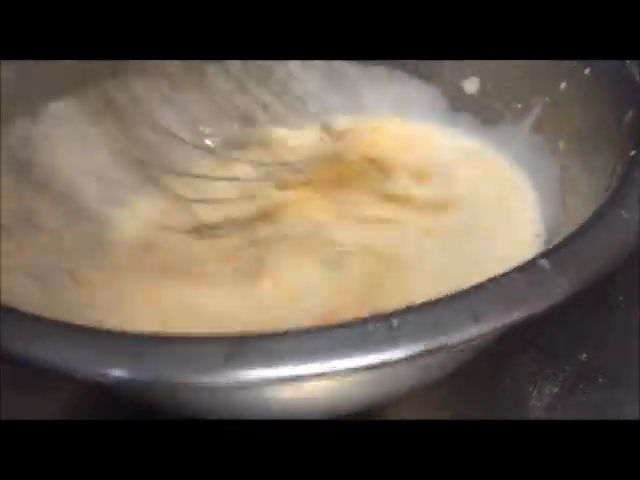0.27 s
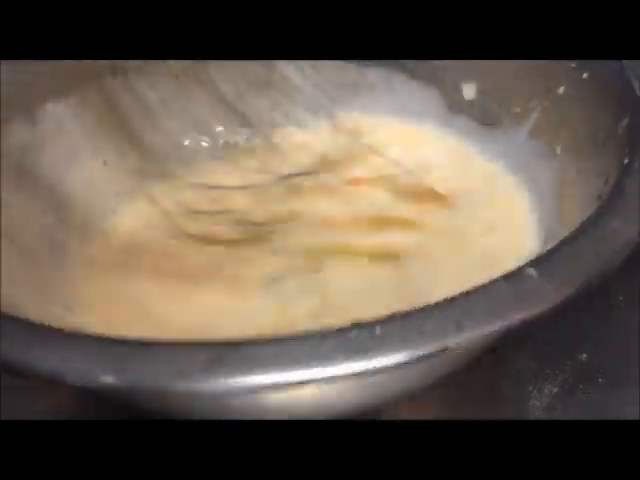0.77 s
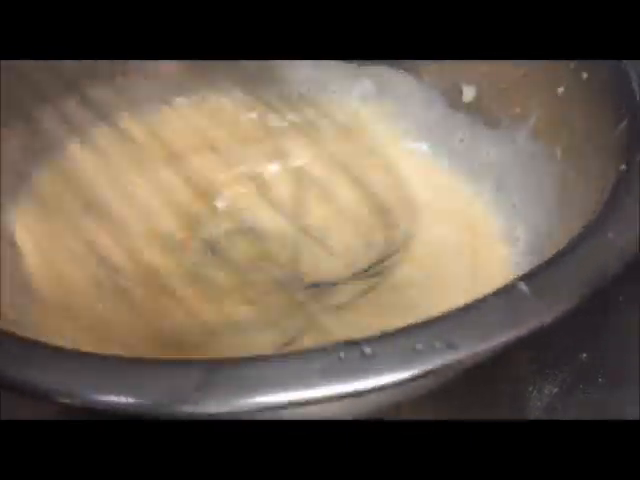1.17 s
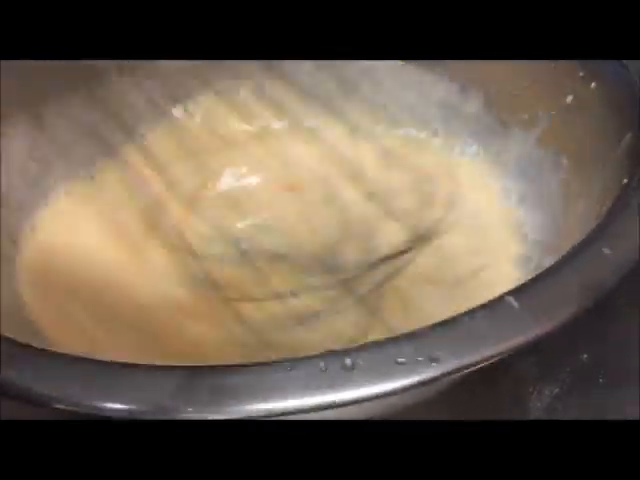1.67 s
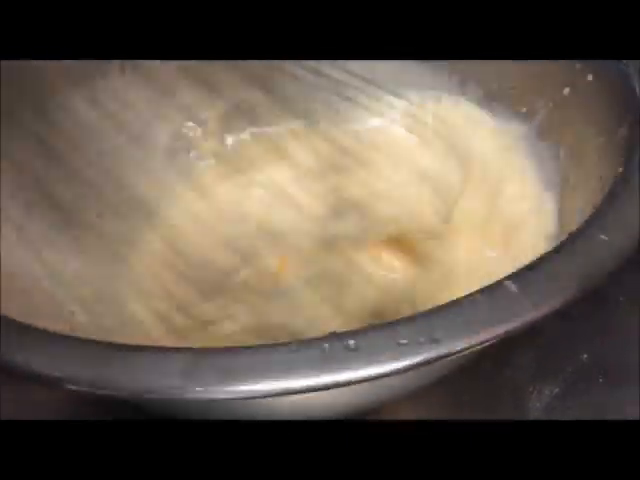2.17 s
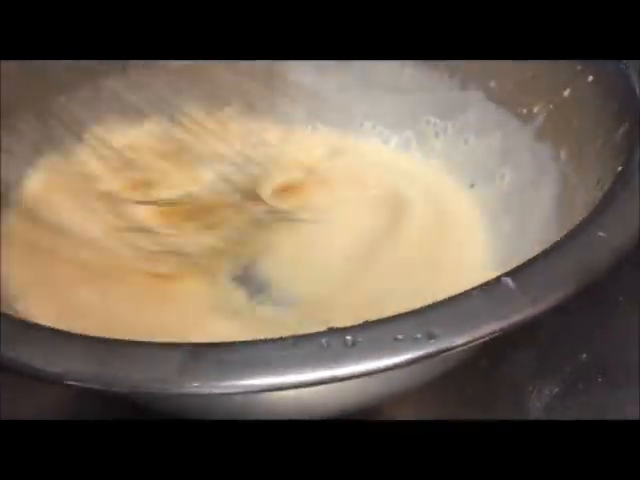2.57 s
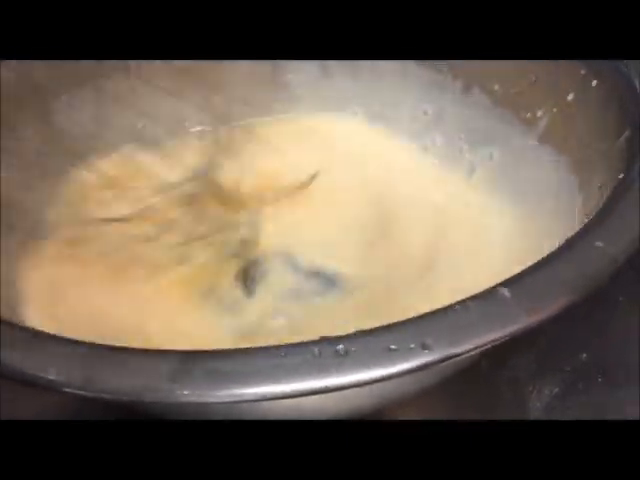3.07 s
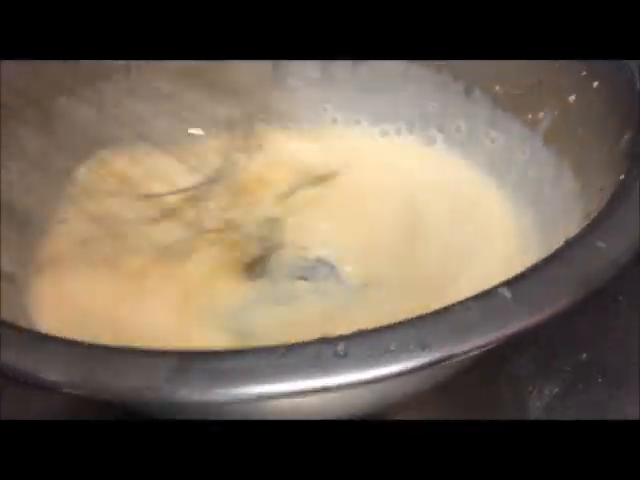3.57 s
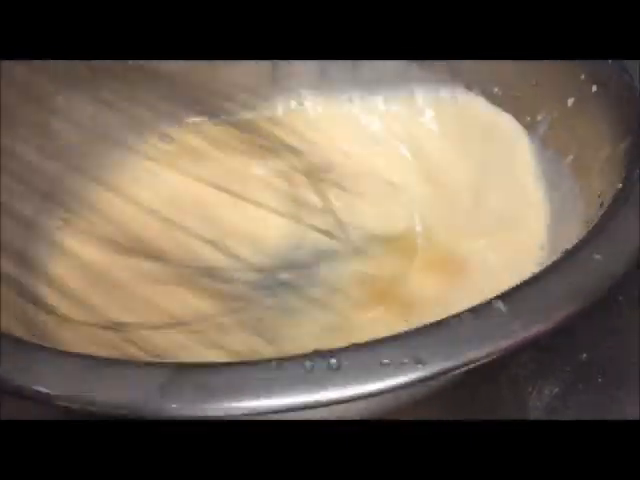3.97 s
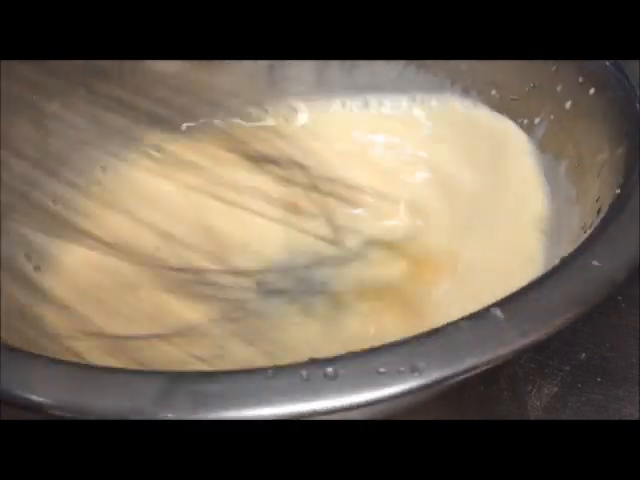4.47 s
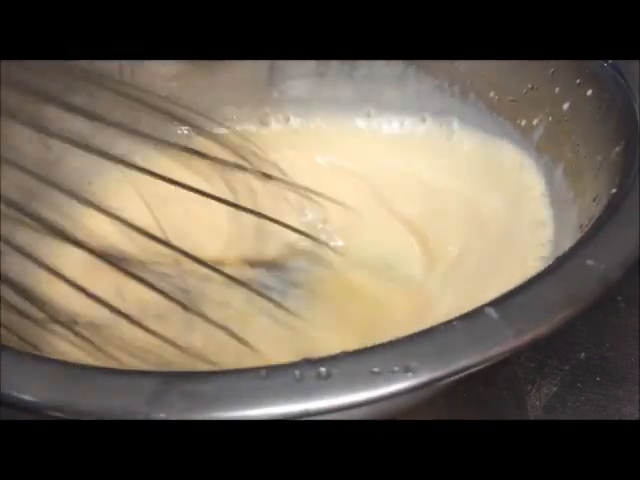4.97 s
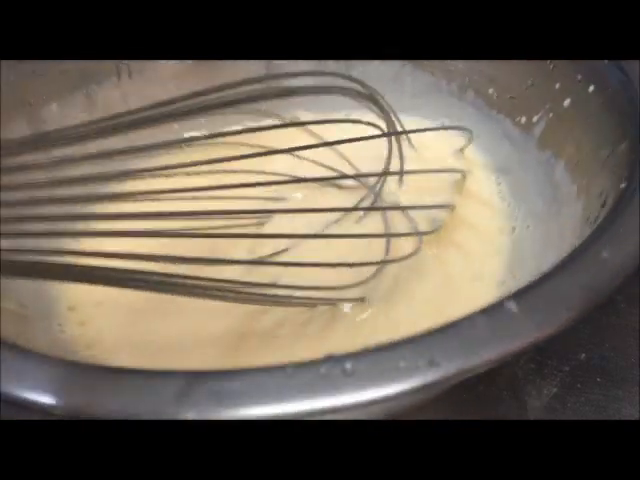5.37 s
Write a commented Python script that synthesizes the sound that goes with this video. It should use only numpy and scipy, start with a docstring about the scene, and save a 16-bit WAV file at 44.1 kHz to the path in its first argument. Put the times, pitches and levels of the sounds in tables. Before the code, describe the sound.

A wire whisk briskly beats thin egg batter in a steel bowl, metallic knocks and wet sloshing, then harder scraping sweeps before stopping.

```python
"""A light knock, then a gulp: close by in a kitchen, a wire whisk beats thin egg batter in a steel bowl.
Flicks at about four a second plunge in, and noise knocks with short notes put the wires on the far wall in turn.
After a brief lift the sweeps come harder and add scrapes, dense noise bursts under a swelling pressure; then it stops.
The batter is many small rising sine bubbles and crackling noise; filters with resonances make the bowl ring.
Short room reflections surround it, dull thumps come from the counter, and a fan hums behind."""
import sys
import numpy as np
from scipy import signal
from scipy.fft import rfft, irfft
from scipy.io import wavfile

SR = 44100
rng = np.random.default_rng(int(sys.argv[2]) if len(sys.argv) > 2 else 0)


def wav_out(sig):
    """Save sig, one row per channel (or a flat mono array), as 16-bit PCM at SR to the path in sys.argv[1]."""
    wavfile.write(sys.argv[1], SR, np.round(np.clip(np.atleast_2d(sig).T, -1, 1) * 32767).astype(np.int16))


N = 248456
TIME = np.arange(N) / SR

# flicks across the bowl, each begun by a knock on the bottom: start_s, knock_db
FLICKS = [(.0977, -17.5), (.318, -17.5), (.553, -22), (.804, -21), (1.058, -19), (1.314, -18.5),
          (1.563, -16.5), (1.82, -21.5)]
# sweeps round the bowl that dive through the batter: start_s, knock_db, gulp_db
SWEEPS = [(2.276, -23.5, -45), (2.497, -20, -41), (2.788, -22.5, -26.5), (3.055, -23.5, -36),
          (3.318, -23.5, -33), (3.5543, -16, -24.5), (3.806, -14.5, -24.5), (4.0557, -15.5, -29.5),
          (4.304, -15.5, -29), (4.563, -18.5, -29), (4.806, -12.5, -26.5), (5.051, -16, -29.5),
          (5.276, -22, -38)]
# each flick ends on the far wall: start_s, bowl_clank_db, wire_ting_db, gap_to_next_wire_s
WALL_KNOCKS = [(0.1509, -19, -19.5, .036), (0.3692, -14.5, -15, .043), (.6132, -19, -16.5, 0.044),
               (0.8637, -16.5, -14.5, 0.049), (1.111, -17, -16.5, 0.055), (1.372, -17, -13.5, .039),
               (1.6163, -16, -15, 0.036), (1.865, -18, -17.5, .028)]
# wires reaching the far wall in turn, relative to the wall knock: clank_db, ting_db
WIRE_TURNS = [(-0.5, 0.5), (-7, -9), (-9, -8)]
# wires land on the wall and drag along it: start_s, length_s, bowl_clank_db, wire_ting_db, landing_knock_db
SCRAPES = [(2.167, 0.037, -24.5, -22.5, -17.5), (2.565, 0.091, -30.5, -20.5, -17.5),
           (2.689, 0.044, -21, -18, -14), (2.954, .058, -22.5, -19, -19), (3.213, 0.043, -16, -12.5, -22),
           (3.425, 0.076, -20.5, -17, -26), (3.676, 0.083, -20.5, -21, -20.5),
           (3.923, 0.078, -28, -18, -16), (4.196, 0.061, -18, -20.5, -20.5), (4.42, .065, -22.5, -18, -9.5),
           (4.69, 0.068, -17.5, -16.5, -19), (4.923, 0.066, -22.5, -15.5, -16),
           (5.165, 0.059, -16, -17, -29)]
# lone knocks between the strokes: start_s, bowl_clank_db, wire_ting_db
LONE_KNOCKS = [(.007, -29, -25.5), (.2228, -34, -18.5), (1.162, -22, -19.5), (2.013, -29.5, -38),
               (2.35, -23, -30), (2.599, -27, -20.5), (2.972, -32, -11), (3.154, -31, -19.5),
               (4.628, -18, -25.5)]
# how briskly the whisk stirs, before the swish of each stroke: time_s, slosh_db, wire_rustle_db
STIR = [(0.0, -32.5, -33), (0.34, -35.5, -33), (1.32, -30.5, -32), (1.5, -26.5, -26), (1.82, -29.5, -29),
        (2.01, -35.5, -35), (2.22, -30, -30), (2.4, -30, -30), (3.9, -24, -26.5), (5.14, -25.5, -29.5),
        (5.38, -41, -44.5), (5.63, -46, -62)]
# swish over one stroke, quietest near the turn before the next plunge: share_of_stroke, level_db
FLICK_SWISH = [(0, -2.5), (.08, 4), (.35, 2.5), (.62, 1.5), (.8, -5.5), (1, -4)]
SWEEP_SWISH = [(0, -0.5), (.12, 3), (.35, -1), (.62, 2.5), (.76, 0.5), (.87, -4.5), (1, 1)]
# a rubbed wire or the bowl sings out briefly: start_s, centre_pitch_hz, level_db
RINGS = [(1.866, 1294, -15.5), (2.244, 2400, -23), (2.6, 7360, -12), (2.708, 4040, -8), (4.421, 6380, -11)]
# the lifted whisk touches the bowl softly: start_s, level_db (before softening)
TAP = (5.538, -23)
# the bowl rocks on the counter: start_s, level_db
THUMPS = [(0.386, -40), (1.371, -31.5), (1.9, -34), (5.58, -36)]
# broad colours of bowl, wires, batter and the air of the kitchen: frequency_hz, relative_level_db
CLANK_COLOUR = [(150, -32.5), (400, -10.5), (520, -14), (750, -6), (1400, -2), (2200, 1.5), (3400, 3.5),
                (4200, -8.5), (6000, -28.5)]
TING_COLOUR = [(2000, -16.5), (3400, -11.5), (4100, 0), (4800, -5), (6300, -1.5), (7800, -1.5),
               (9400, -5.5), (10400, -11.5), (11300, -8), (15300, -16)]
BATTER_COLOUR = [(150, -22), (350, -3), (500, -12), (700, -2), (1000, -1), (1400, -0.5), (3000, 2.5),
                 (4500, -4.5), (9000, -6.5), (15000, -19.5)]
KITCHEN_COLOUR = [(20, -10), (35, -36), (50, -7.5), (80, 1.5), (130, 2), (175, -14.5), (260, 0),
                  (450, -17.5), (1000, -12.5), (3000, -34), (8000, -53), (15000, -57)]
# resonances of the filled bowl: frequency_hz, width_hz, level_over_broad_colour_db
BOWL_MODES = [(670, 47, -3.5), (833, 8.9, -13), (1297, 38, -6), (1472, 46, -9.5), (2161, 49, 0),
              (2680, 106, -2), (3530, 240, -8), (4400, 53, -13), (5290, 350, -7.5), (6120, 120, -5.5),
              (6700, 89, -5.5), (7340, 104, -1)]
# fan tones: pitch_hz, level_db (before the swell)
FAN_TONES = [(91.5, -55), (119, -60), (130, -51), (264, -61)]

PLUNGE_TING_DB, FLICK_GULP_DB = -2.5, -13.5  # relative to the knock of the plunge
LAND_CLANK_DB = -10.5  # a glancing landing hardly stirs the bowl: clank relative to the landing knock
WALL_RING_HZ, WALL_RING_DB = 2150, 0.5  # the modes that a wall knock wakes, level relative to its clank
SCRAPE_ARCH_DB = 3.5  # a scrape presses harder in its middle than at its ends
SLOSH_DB, RUSTLE_DB = -1.5, -0.07  # overall level of the slosh and of the wire rustle
SLOSH_LAG_S = 0.034  # the slosh level runs this much behind the rustle level
LIFT_S, LIFT_WIDTH_S, LIFT_DB = 2.11, 0.049, -20.5  # the whisk leaves the batter between flicks and sweeps
REST_S, REST_FADE_S, REST_DB = 5.39, 0.032, -9.5  # the whisk comes to rest and the batter settles
TOP_HZ = 15400  # upper limit of the recorder


def whisk(rustle_db):
    """Knocks and stick-slip scrapes drive the low ring of the bowl and the bright ring of the wires."""
    low_slips = chatter(rate=600, spread_db=-2.0, fade_s=0.0026)
    high_slips = chatter(rate=600, spread_db=-2.0, fade_s=0.0026)
    hits = contacts()

    clank = knocks(hits, 1, rise_s=0.00057, fade_s=0.0091, follow_s=.008, follow_db=-8.0,
                   ring_hz=2005, ring_spread=.7, ring_cycles=114, ring_db=-13.5)
    clank = clank + low_slips * pressure(2, rise_s=0.0028, release_s=0.003)

    ting = knocks(hits, 2, rise_s=.0012, fade_s=.005, follow_s=.008, follow_db=-9,
                  ring_hz=6500, ring_spread=.55, ring_cycles=140, ring_db=-12)
    ting = ting + high_slips * pressure(3, rise_s=0.0046, release_s=0.0019)

    # between knocks the loops keep grazing the wall and each other
    rustle = undb(rustle_db) * chatter(rate=220, spread_db=2.5, fade_s=0.0039)
    steel = body(clank, CLANK_COLOUR, BOWL_MODES) + body(ting + rustle, TING_COLOUR, BOWL_MODES)
    return wander(steel, low_hz=1200, high_hz=13500, depth_db=5, rate=40, sharpness=18)


def contacts():
    """Every knock of wire on steel, as rows of (start_s, clank_db, ting_db)."""
    bottom = [(s, db, db + PLUNGE_TING_DB) for s, db, *_ in FLICKS + SWEEPS]
    wall = []
    for s, clank_db, ting_db, gap_s in WALL_KNOCKS:
        for k, (turn_clank_db, turn_ting_db) in enumerate(WIRE_TURNS):
            wall.append((s + k * gap_s, clank_db + turn_clank_db, ting_db + turn_ting_db))
    landings = [(s, db + LAND_CLANK_DB, db) for s, *_, db in SCRAPES]
    return bottom + wall + landings + LONE_KNOCKS


def knocks(rows, column, rise_s, fade_s, follow_s, follow_db,
           ring_hz, ring_spread, ring_cycles, ring_db, count=5):
    """One wire lands and buzzes on the steel, the next follows; each knock rings with a few notes of its own."""
    track, t = np.zeros(N), TIME[:SR // 10]
    attack = int(.012 * SR)  # the level is set over this opening
    for row in rows:
        late = t - follow_s * rng.uniform(.5, 1.4)
        second_wire = undb(follow_db) * (late > 0) * np.exp(-np.abs(late) / fade_s)
        hit = (np.exp(-t / fade_s) + second_wire) * rng.standard_normal(len(t))
        # ring_spread is in octaves either way
        notes_hz = ring_hz * 2 ** (ring_spread * rng.uniform(-1, 1, count))
        for hz, sign in zip(notes_hz, rng.choice([-1, 1], count)):
            note = ping(hz, ring_cycles)[:len(t)]
            hit[:len(note)] += undb(ring_db) * sign * note
        # the film of batter cushions the landing
        hit *= 1 - np.exp(-t / (rise_s * np.exp(rng.uniform(-1.2, .4))))
        add(track, row[0], hit * undb(row[column]) / np.sqrt(np.mean(hit[:attack] ** 2)))
    return track


def pressure(column, rise_s, release_s):
    """How hard the wires press on the wall: each scrape lands, swells to its middle and lets go."""
    total = np.zeros(N)
    for row in SCRAPES:
        age, length_s = TIME - row[0], row[1]
        arch_db = -SCRAPE_ARCH_DB * (2 * np.clip(age / length_s, 0, 1) - 1) ** 2
        landing = np.minimum(age, 0) / rise_s
        release = np.maximum(age - length_s, 0) / release_s
        total += undb(row[column] + arch_db) * np.exp(landing - release)
    return total


def swish():
    """Level in dB that rises and falls through each stroke, dips at the lift and drops at rest."""
    starts = [s for s, _ in plunges()]
    # one more stroke on either side covers the ends
    starts = [2 * starts[0] - starts[1], *starts, 2 * starts[-1] - starts[-2]]
    share = np.interp(TIME, starts, np.arange(len(starts))) % 1
    flick_db = np.interp(share, *np.transpose(FLICK_SWISH))
    sweep_db = np.interp(share, *np.transpose(SWEEP_SWISH))
    lift_db = LIFT_DB * np.exp(-((TIME - LIFT_S) / LIFT_WIDTH_S) ** 2)
    rest_db = REST_DB * np.clip((TIME - REST_S) / REST_FADE_S, 0, 1)
    return np.where(TIME < LIFT_S, flick_db, sweep_db) + lift_db + rest_db


def rings(rub_s, spread, count=5):
    """A short rub swells a cluster of close modes, which beat as they die."""
    track, t = np.zeros(N), TIME[:SR // 8]
    swell = t / rub_s * np.exp(1 - t / rub_s)
    wall_rings = [(s, WALL_RING_HZ, db + WALL_RING_DB) for s, db, *_ in WALL_KNOCKS]
    for s, hz, db in wall_rings + RINGS:
        notes_hz = hz * (1 + spread * np.linspace(-1, 1, count) * rng.random(count))
        notes = np.sin(2 * np.pi * (notes_hz * t[:, None] + rng.random(count)))
        ring = swell * notes.sum(axis=1)
        add(track, s, undb(db) * ring * np.linalg.norm(swell) / np.linalg.norm(ring))
    return track


def tap(fade_s, soft_hz):
    """A coated wire touches the bowl with a dull tick: a fading noise burst, softened above soft_hz."""
    track, t = np.zeros(N), TIME[:SR // 10]
    start_s, level_db = TAP
    add(track, start_s, undb(level_db) * rng.standard_normal(len(t)) * np.exp(-t / fade_s))
    softened = signal.lfilter(*signal.butter(1, soft_hz, fs=SR), track)
    return body(softened, BATTER_COLOUR, BOWL_MODES)


def batter(slosh_db, count=2400):
    """Bubbles of all sizes and wet crackle follow the stirring; the bowl colours them."""
    pitches = 480 * 2 ** (2.8 * rng.random(count) ** .7)
    times = rng.random(count) * N / SR
    froth = unit(bubbles(times, pitches, cycles=32, spread_db=2.5, glide=0.042))
    crackle = chatter(rate=300, spread_db=6.5, fade_s=0.0053)
    slosh = undb(slosh_db) * (crackle + froth / 2)
    plunge = gulps(length_s=.05, first_hz=2900, last_hz=1250, scatter=.38)
    liquid = body(slosh + plunge, BATTER_COLOUR, BOWL_MODES)
    return wander(liquid, low_hz=690, high_hz=3400, depth_db=6.5, rate=22, sharpness=30, count=14)


def plunges():
    """Every dive into the batter, as rows of (start_s, gulp_db)."""
    return [(s, db + FLICK_GULP_DB) for s, db in FLICKS] + [(s, db) for s, _, db in SWEEPS]


def gulps(length_s, first_hz, last_hz, scatter, count=48):
    """The cavity behind the wires opens up, so each plunge sheds ever larger, on the whole lower bubbles."""
    track = np.zeros(N)
    for s, db in plunges():
        age = (np.arange(count) + rng.random(count)) / count
        # scatter is in octaves
        hz = first_hz * (last_hz / first_hz) ** age * 2 ** (scatter * rng.standard_normal(count))
        track += undb(db) * bubbles(s + age * length_s, hz, cycles=26.0, spread_db=2.0, glide=0.066)
    return track


def bubbles(times, pitches, cycles, spread_db, glide):
    """Trapped air pockets of uneven size ring briefly in the liquid, rising in pitch."""
    track = np.zeros(N)
    chances = np.clip(rng.standard_normal((len(times), 2)), -2, 2)
    for s, hz, (size, life) in zip(times, pitches, chances):
        note = ping(min(hz, SR / 3), cycles * np.exp(life / 3), glide)
        add(track, s, undb(spread_db * size) * note)
    return track


def thumps(cycles):
    """The heavy bowl bumps the counter, which answers with a few dull notes."""
    track = np.zeros(N)
    for s, db in THUMPS:
        for hz in (56, 72, 97):
            add(track, s, undb(db) * ping(hz * rng.uniform(0.98, 1.34), cycles))
    return signal.sosfilt(signal.butter(6, 48, "high", fs=SR, output="sos"), track)


def room(x, t60_s, wet_db, gap_s):
    """Counter, tiles and cupboards return a short, diffuse tail after a gap."""
    t = TIME[:SR // 2]
    tail = rng.standard_normal(len(t)) * undb(-60 * t / t60_s) * np.clip(t / gap_s - 1, 0, 1)
    return x + undb(wet_db) * signal.fftconvolve(x, tail / np.linalg.norm(tail))[:N]


def fan():
    """A steady low rush of air with a few wavering tones that swell once, from 1.5 to 3 s."""
    swell_db = np.interp(TIME, (1.5, 3), (-2, 1))
    hum = np.zeros(N)
    for hz, db in FAN_TONES:
        gain = undb(db + swell_db + 1.9 * walk(9.9)) * np.sqrt(2)
        hum += gain * np.sin(2 * np.pi * hz * TIME + 0.89 * walk(12))
    return hum + undb(-41.5) * body(rng.standard_normal(N), KITCHEN_COLOUR)


def chatter(rate, spread_db, fade_s):
    """Tiny contacts of uneven size at random moments (rate per second), each a noise burst that dies away."""
    sizes = undb(spread_db * np.clip(rng.standard_normal(N), -2, 2))
    hits = (rng.random(N) < rate / SR) * sizes
    energy = signal.lfilter([1], [1, -np.exp(-2 / (fade_s * SR))], hits ** 2)
    return unit(np.sqrt(energy + 1e-18) * rng.standard_normal(N))


def ping(hz, cycles, glide=0):
    """A sine that falls by 60 dB in so many cycles of its first pitch while that pitch glides up."""
    life = np.arange(int(cycles / hz * SR) + 2) / (cycles / hz * SR)
    return np.sin(2 * np.pi * cycles * life * (1 + glide * life / 2)) * np.exp(-np.log(1000) * life)


def body(x, colour, modes=(), size=8192):
    """Ring x through a causal filter of unit energy: a broad colour with resonances on it."""
    hz = np.arange(size // 2 + 1) * SR / size + 1
    knots, db = np.transpose(colour)
    gain = undb(np.interp(np.log(hz), np.log(knots), db))
    gain = gain * np.abs(1 + sum(undb(d) / (1 + 2j * (hz - f) / w) for f, w, d in modes))
    # folding the cepstrum gives minimum phase, so the ring follows the blow
    cepstrum = irfft(np.log(gain))
    cepstrum[1:size // 2] *= 2
    cepstrum[size // 2 + 1:] = 0
    response = irfft(np.exp(rfft(cepstrum)))
    return signal.fftconvolve(x, response / np.linalg.norm(response))[:N]


def wander(x, low_hz, high_hz, depth_db, rate, sharpness, count=20):
    """As the whisk travels and the batter shifts, the bowl favours now these bands, now those."""
    out = x
    for hz in np.geomspace(low_hz, high_hz, count):
        drive = x * (undb(depth_db * np.clip(walk(rate), -2, 2)) - 1)
        out = out + signal.lfilter(*signal.iirpeak(hz, sharpness, fs=SR), drive)
    return out * np.std(x) / np.std(out)


def walk(rate):
    """Random drift with a spread near one, in straight lines between rate knots a second."""
    knots = rng.standard_normal(4096)
    return 1.2 * np.interp(TIME * rate, np.arange(len(knots)), knots)


def undb(db):
    """Decibels to gain."""
    return 10 ** (np.asarray(db) / 20)


def unit(x):
    """Scale to an rms of one."""
    return x / np.sqrt(np.mean(x ** 2) + 1e-18)


def add(track, s, sound):
    """Mix a sound into a track at time s."""
    i = int(np.clip(s * SR, 0, N - 1))
    track[i:i + len(sound)] += sound[:N - i]


def scene():
    """Whisk and batter close by, with the kitchen around them and the fan behind."""
    s, slosh_db, rustle_db = np.transpose(STIR)
    swish_db = swish()
    wires = whisk(np.interp(TIME, s, rustle_db) + swish_db + RUSTLE_DB)
    liquid = batter(np.interp(TIME - SLOSH_LAG_S, s, slosh_db) + swish_db + SLOSH_DB)
    beating = wires + liquid + tap(fade_s=0.009, soft_hz=990) + rings(rub_s=0.0043, spread=.07)
    in_room = room(beating, t60_s=0.29, wet_db=-13.5, gap_s=0.0055)
    return (in_room + thumps(cycles=14) + fan())[None]


def record(dry):
    """The recorder rounds the highest peaks and cuts the top."""
    rounded = np.tanh(dry)
    return signal.sosfilt(signal.ellip(10, .2, 80, TOP_HZ, fs=SR, output="sos"), rounded)


dry = scene()
out = record(dry)
wav_out(out)
```